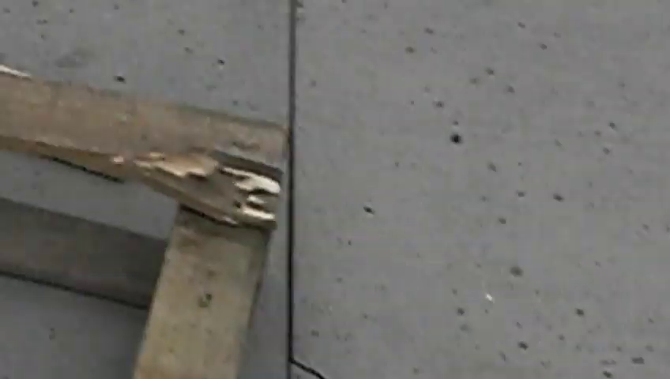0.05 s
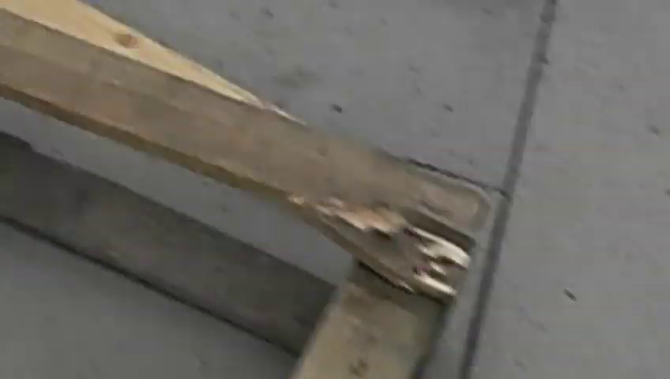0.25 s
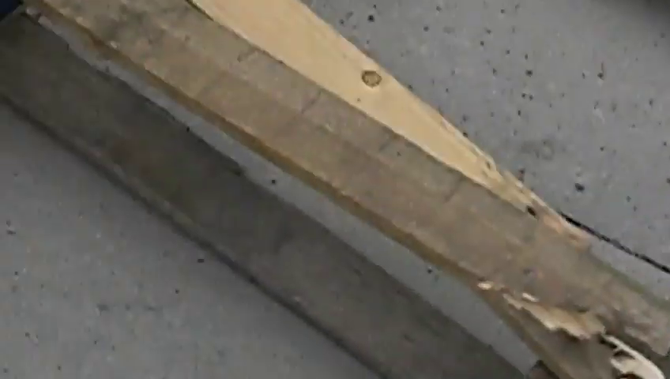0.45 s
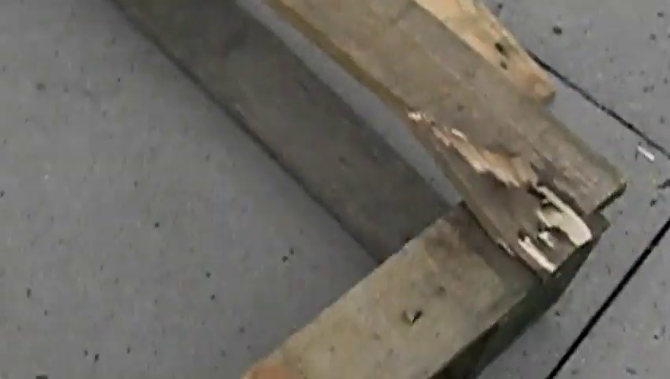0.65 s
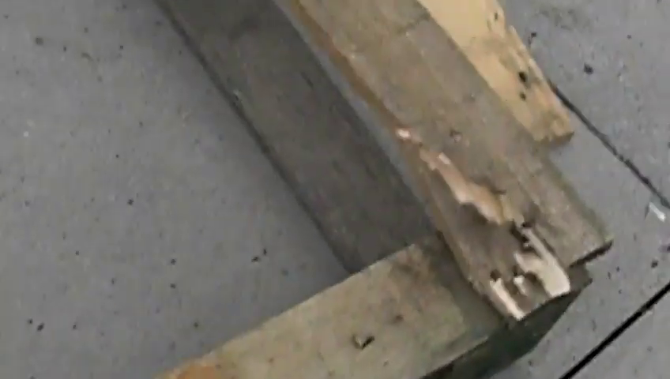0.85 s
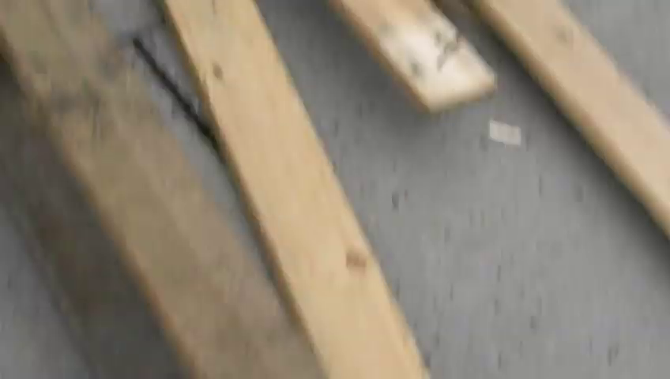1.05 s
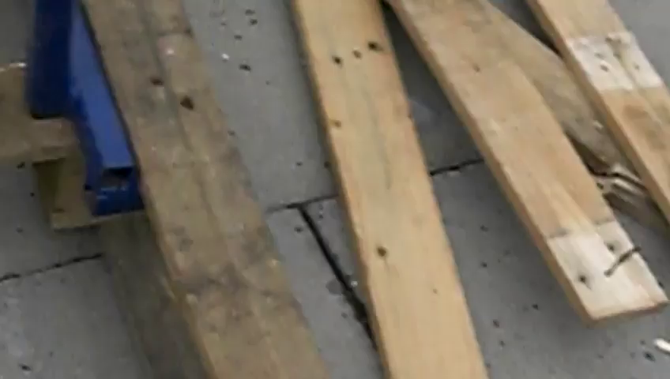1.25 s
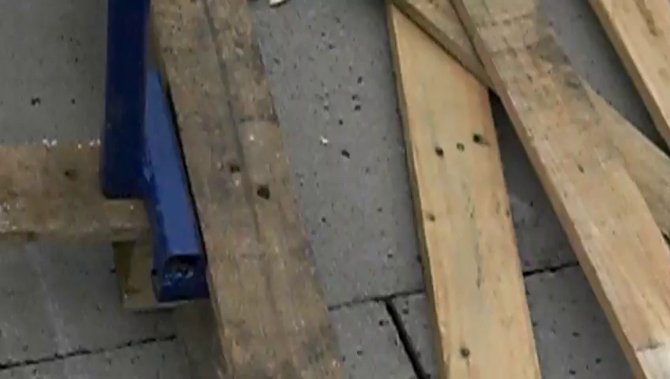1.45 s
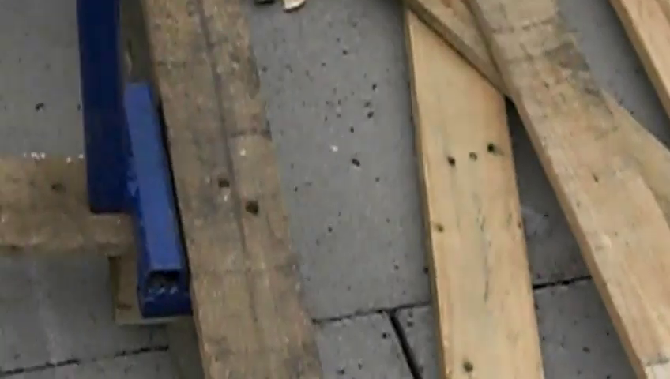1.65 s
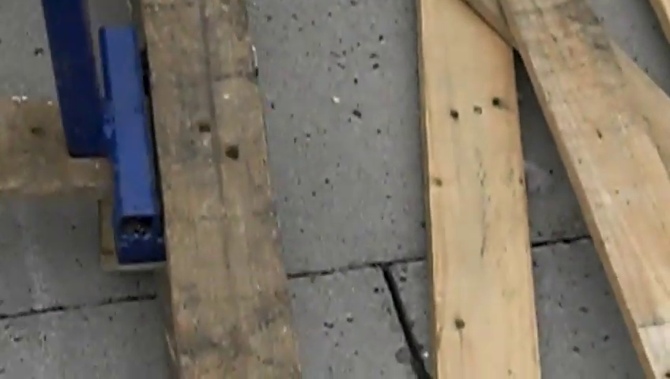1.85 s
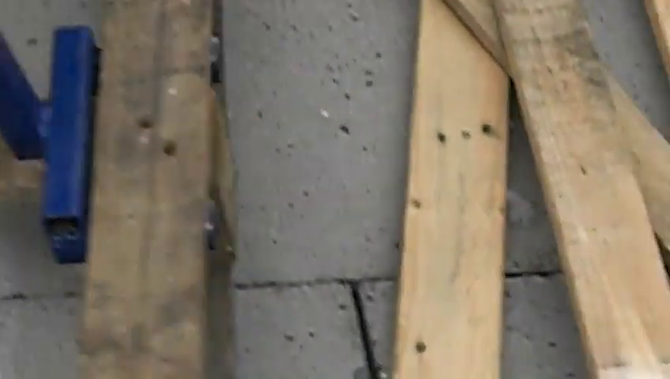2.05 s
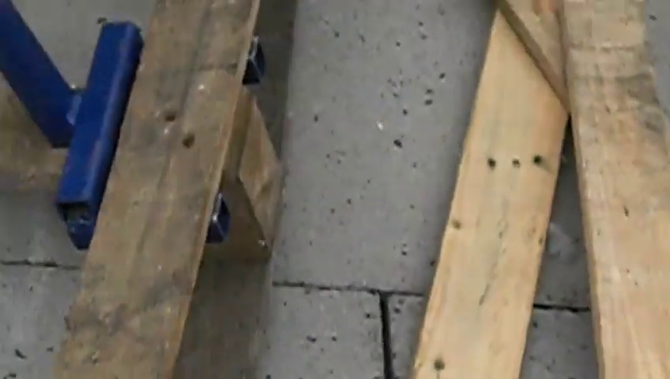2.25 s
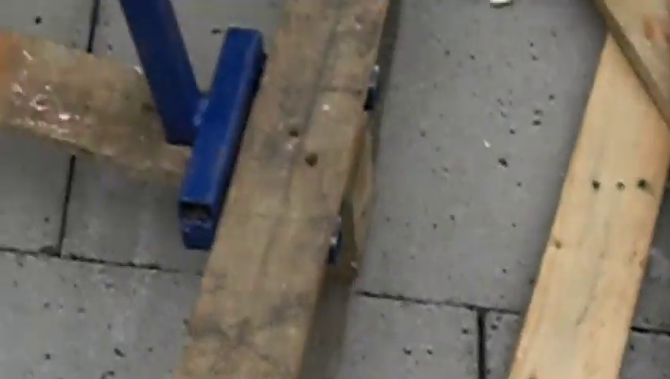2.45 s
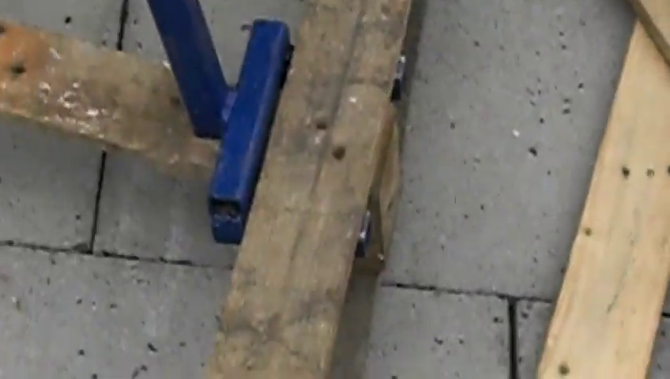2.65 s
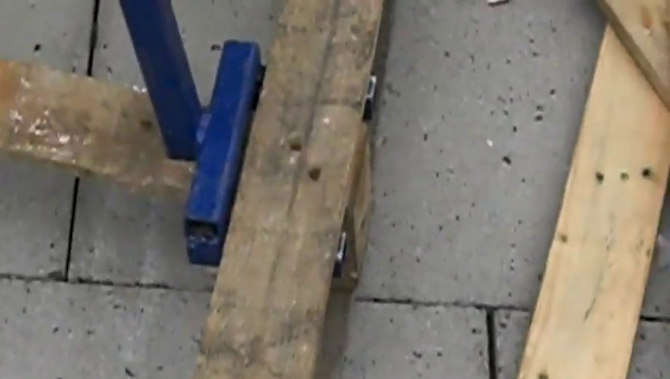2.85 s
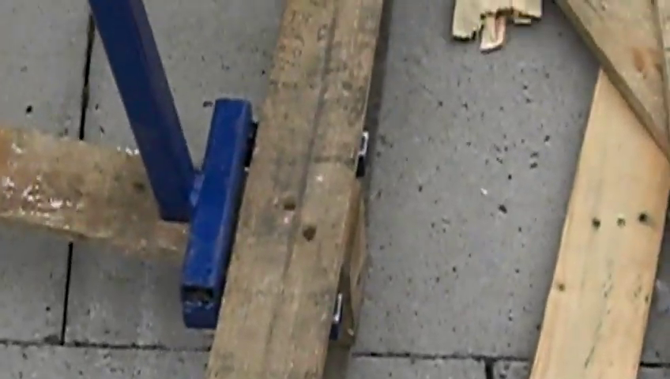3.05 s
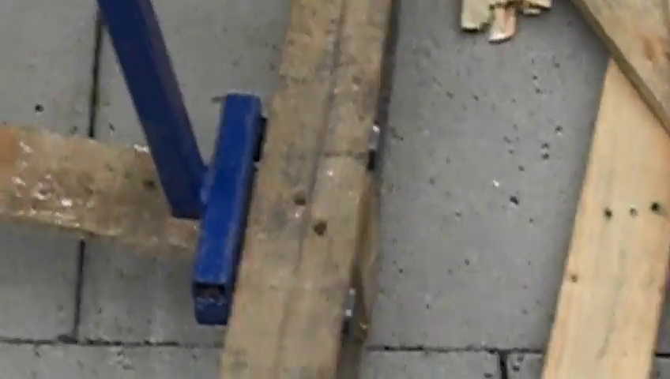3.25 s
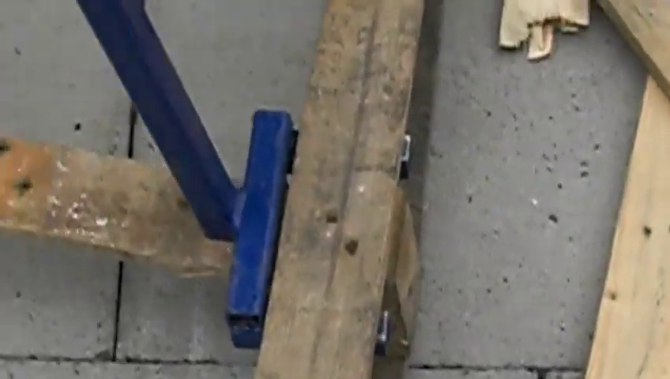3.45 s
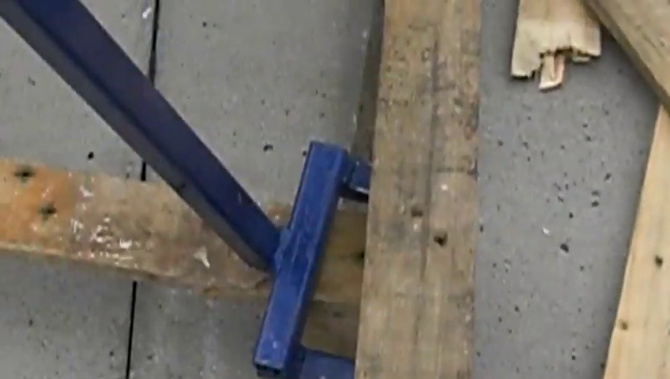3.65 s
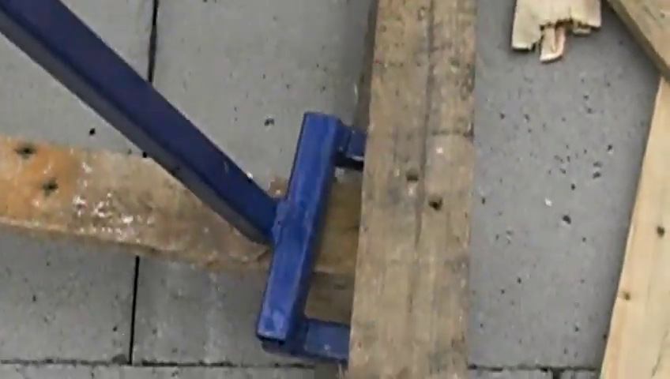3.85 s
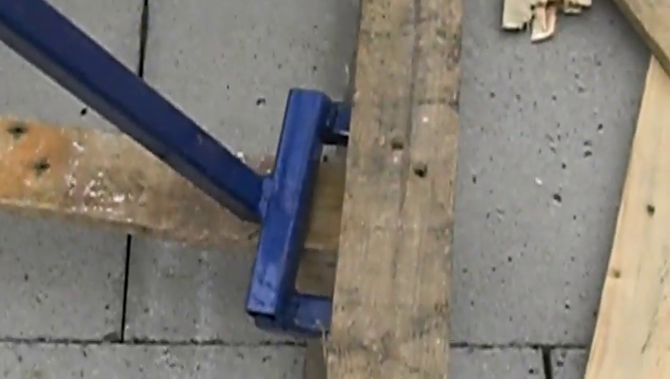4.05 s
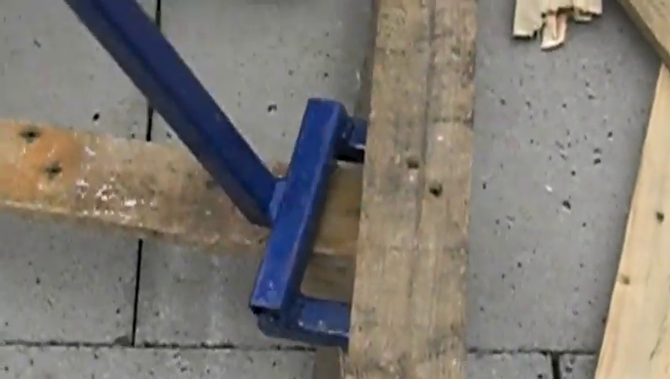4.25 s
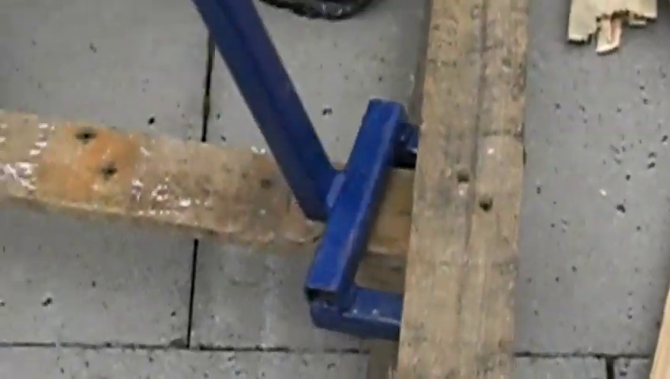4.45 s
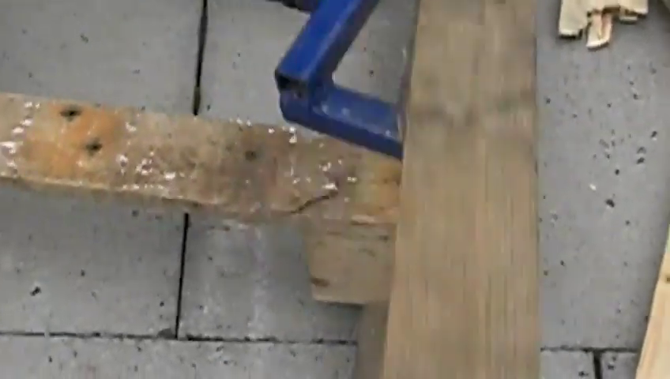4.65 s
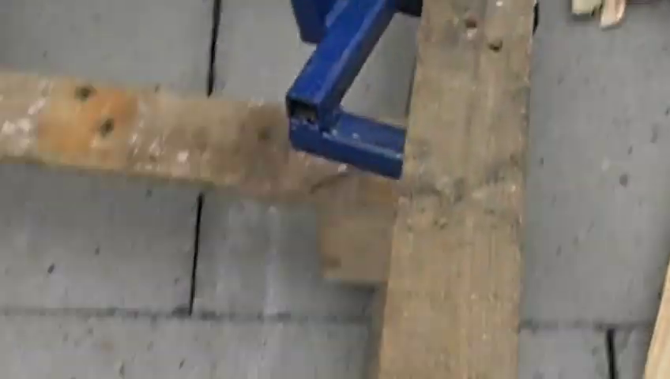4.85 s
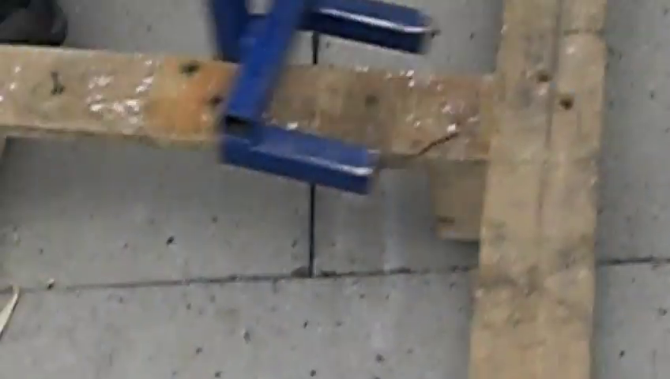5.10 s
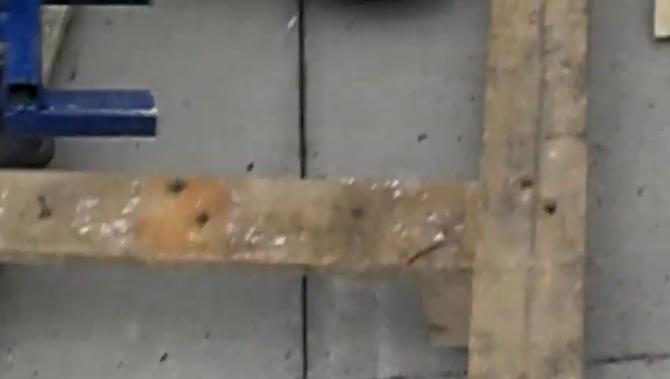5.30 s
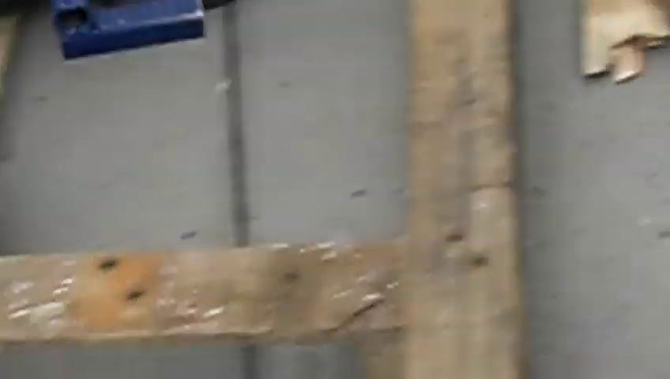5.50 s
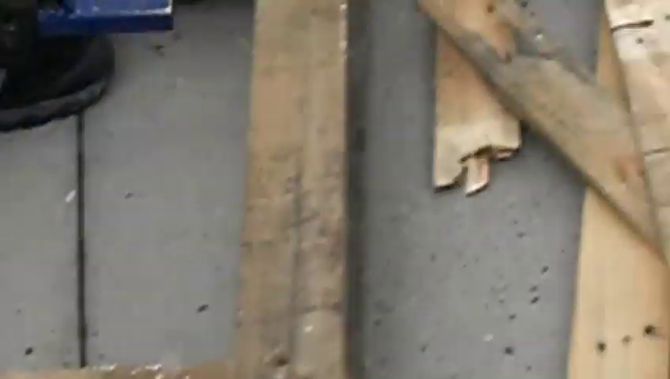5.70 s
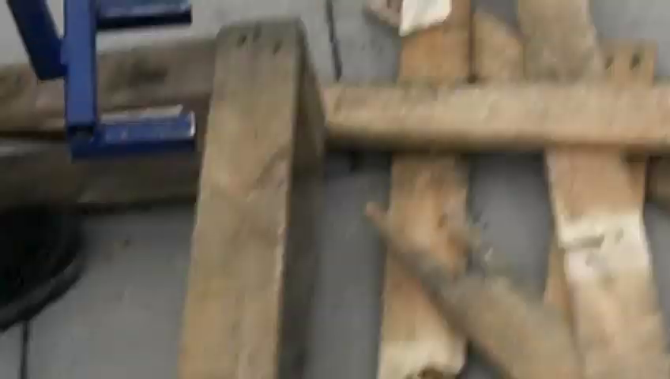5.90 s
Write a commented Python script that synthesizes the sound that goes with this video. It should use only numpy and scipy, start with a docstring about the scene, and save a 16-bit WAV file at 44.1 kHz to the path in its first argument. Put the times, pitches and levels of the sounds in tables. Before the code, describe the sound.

A steel bar prises pallet boards apart on paving. Quiet knocks and gritty scrapes come first, then a sharp splitting burst with metallic nail ring, a tiny nail chirp, a lull, and a second longer ragged crackle. Later sounds are duller bumps, ticks and heavy gusts rumbling and popping on the microphone. Dry and close, with short scattered yard echoes; loud cracks briefly duck the background.

```python
"""A wooden pallet cracks and gives up its nails as a steel bar levers it apart outdoors, close by.
Noise bursts ring wood and nail resonances for the cracks, knocks and ticks; sparse slips make the rubs.
Boards knock and tick as the bar is seated; two heaves crack the wood and jerk the nails out in slips.
Then gusts buffet the microphone with shaped noise and eddy pulses, over a distant wash.
A gain control ducks the whole sound on loud cracks and recovers slowly."""
import sys
import numpy as np
from scipy import signal
from scipy.fft import rfft, irfft, next_fast_len
from scipy.io import wavfile
from scipy.ndimage import uniform_filter1d

SR = 44100
rng = np.random.default_rng(int(sys.argv[2]) if len(sys.argv) > 2 else 0)


def master(y):
    """Save y as 16-bit WAV."""
    cut = np.clip(np.atleast_2d(y).T, -1, 1)
    pcm = np.round(cut * 32767)  # scale
    wavfile.write(sys.argv[1], SR, pcm.astype(np.int16))


N = 261513

# resonances of the boards: (frequency [Hz], width [Hz], level [dB])
BOARD_MODES = [(268, 170, 2), (484, 230, -2.5), (603, 45, 1.5), (840, 82, 1.5), (1065, 43, 4.5),
               (1228, 28, 3), (1336, 45, 7.5), (1733, 60, -9), (2043, 56, 5), (2346, 30, 4),
               (2900, 42, -0.5), (2960, 80, -9.5), (4030, 110, 3), (4700, 40, -3.5)]
# resonances of nails gripped in wood, against the bar: (frequency [Hz], width [Hz], level [dB])
NAIL_MODES = [(1224, 27, 6.5), (1381, 80, 5), (2368, 42, 11), (3660, 71, 6.5), (4390, 140, 3),
              (4540, 97, -2.5), (5010, 140, -8.5), (5345, 80, -10.5), (6106, 77, 4), (7200, 200, 0),
              (9630, 83, 5.5), (11300, 70, -1.5)]
# colour of a fracture: (frequency [Hz], level [dB])
FRACTURE_COLOUR = [(100, -10), (250, -2.5), (450, -7), (800, 1.5), (1300, -2), (1900, 4), (3000, 3.5),
                   (5000, 6), (6600, -3), (9500, -3.5), (11000, -6.5), (14000, -6), (17000, -9.5)]
# colour of rubbing and torn fibres: (frequency [Hz], level [dB])
RUB_COLOUR = [(600, -20.5), (1400, 5.5), (2500, -2.5), (4800, 2), (6600, -7.5), (9000, -9.5),
              (17000, -15.5)]
# the body, middle and edge of a blow
BANDS = [signal.butter(3, edge, kind, fs=SR, output="sos")
         for edge, kind in [(1500, "low"), ((1500, 6000), "band"), (6000, "high")]]


def gain_of(db):
    """Decibels to amplitude."""
    return 10 ** (np.asarray(db) / 20)


def evened(x):
    """Scales to rms 1."""
    return x / np.sqrt(np.mean(x ** 2) + 1e-20)


def read(points, hz):
    """Reads a curve on a log-frequency axis."""
    f, value = np.transpose(points)
    return np.interp(np.log(hz + 1), np.log(f + 1), value)


def add(mix, s, sound):
    """Mixes a sound in at time s, cut off at the end of the mix."""
    part = mix[max(round(s * SR), 0):][:len(sound)]
    part += sound[:len(part)]


def colour(x, spectrum):
    """Causal minimum-phase filter with the given spectrum; the result has rms 1."""
    size = next_fast_len(2 * len(x))
    log_gain = np.log(gain_of(read(spectrum, abs(np.fft.fftfreq(size, 1 / SR)))))
    response = np.exp(np.conj(signal.hilbert(log_gain)))
    filtered = irfft(rfft(x, size) * response[:size // 2 + 1], size)
    return evened(filtered[:len(x)])


def resonate(x, hz, width):
    """One decaying resonance of gain 1; a narrower one rings longer."""
    r = np.exp(-np.pi * width / SR)
    return 2 * signal.lfilter([1 - r], [1, -r * np.exp(2j * np.pi * hz / SR)], x).real


def ring_body(x, modes):
    """The driving sound plus every resonance of the body it excites."""
    return x + sum(gain_of(db) * resonate(x, hz, width) for hz, width, db in modes)


def wander(hz):
    """Random drift of rms 1, no faster than the given rate."""
    spectrum = rfft(rng.standard_normal(N))
    return evened(irfft(spectrum * (np.fft.rfftfreq(N, 1 / SR) < hz), N))


def impulses(per_s):
    """Ones at chance moments among zeros, at an average rate per second."""
    return rng.random(N) < per_s / SR


def swells(rows, rise_s, release_db_per_s, fade_db_per_s=0):
    """Gain for every sample: each row rises, holds or fades for its length, then is released."""
    t, power = np.arange(N) / SR, np.zeros(N)
    for start, length, db in rows:
        age = np.maximum(t - start, 0)
        fall_db = fade_db_per_s * age + release_db_per_s * np.maximum(age - length, 0)
        power += (np.minimum(age / rise_s, 1) * gain_of(db - fall_db)) ** 2
    return np.sqrt(power)


def blow(db, bass_db, treble_db, hz, t60, rise, modes, spectrum, width_hz, focus_db, grain_db, bass_hold):
    """A swelling rush of tiny fractures rings the body; the struck spot adds a resonance of its own."""
    t = np.arange(4096) / SR
    noise, grain = rng.standard_normal((2, len(t)))
    grain = np.tanh(evened(uniform_filter1d(grain, size=16)))
    rush = noise * gain_of(grain_db * grain)  # uneven, gritty loudness
    rush *= 1 - np.exp(-(t / rise) ** 2)
    out = np.zeros(len(t))
    for band, band_db, hold in zip(BANDS, (bass_db, 0, treble_db), (bass_hold, 1, 1)):
        push = colour(rush * gain_of(-60 * t / (t60 * hold)), spectrum)
        ring = ring_body(push, modes) + gain_of(focus_db) * resonate(push, hz, width_hz)
        ring = signal.sosfilt(band, ring)
        attack = np.std(ring[:265])  # the first 6 ms set the level
        out += gain_of(db + band_db) * ring / attack
    return out


def air():
    """The distant outdoor wash: coloured noise whose level drifts slightly."""
    # colour of the wash: (frequency [Hz], level [dB])
    wash_colour = [(40, -14), (150, -5), (250, 1), (511, -5), (850, 0), (1150, -2), (1610, -11),
                   (2600, -13.5), (4320, -15.5), (6500, -20.5), (9000, -21), (17000, -24)]
    wash = colour(rng.standard_normal(N), wash_colour)
    return gain_of(-51) * wash * gain_of(0.32 * wander(12))


def wind():
    """Puffs and gusts rumble at the microphone; gusts add a stream of small whirls and single large eddies."""
    # colour of the low wind noise: (frequency [Hz], level [dB])
    rumble_colour = [(10, -13), (28, -1.5), (55, 1), (100, -4), (170, -9), (280, -18.5), (500, -30),
                     (1200, -62)]
    # colour of the large whirls in a gust: (frequency [Hz], level [dB])
    buffet_colour = [(30, -21), (90, -9.5), (180, 0), (330, -4), (520, -11), (800, -26), (1300, -43.5),
                     (2500, -59), (6000, -69)]
    # colour of the small whirls in a gust: (frequency [Hz], level [dB])
    tear_colour = [(100, 2), (500, 9), (900, 1), (1400, -13), (2200, -33), (6000, -45)]
    # soft puffs of air on the microphone: (start [s], length [s], level [dB])
    puff_rows = [(.48, .04, -42), (.72, .08, -44), (.83, 0.13, -32.5), (1.06, 0.14, -36), (1.36, 0.03, -42),
                 (1.51, 0.025, -36), (1.69, 0.062, -41), (2.3, 0.023, -40), (2.6, 0.4, -51),
                 (2.97, 0.26, -40), (3.33, 0.06, -35), (3.92, 0.072, -32.5), (4.06, 0.18, -35),
                 (5.08, 0.47, -33.5), (5.41, 0.053, -28.5), (5.56, .04, -37.5), (5.7, 0.05, -21),
                 (5.82, 0.1, -21)]
    # gusts strong enough to turn turbulent at the microphone port: (start [s], length [s], level [dB])
    gust_rows = [(4.2, 0.03, -16.5), (4.287, 0.089, -18), (4.39, 0.14, -16), (4.55, 0.1, -21.5),
                 (4.848, 0.068, -15.5), (4.935, 0.046, -17), (5.708, 0.0087, -17.5), (5.828, 0.039, -19.5)]
    # single eddies hitting the port: (time [s], peak level [dB])
    eddy_rows = [(4.21, -17), (4.298, -1.5), (4.327, -9.5), (4.348, -27), (4.365, -3.5), (4.961, -3.5),
                 (4.979, 2.5), (5.719, -10.5), (5.7224, -8.5), (5.841, -14)]
    calm_db, gust_rumble_db, fine_db = -51, -9, -12.5
    gust_rise_s, eddy_width_s = 0.012, 0.00088

    puffing = swells(puff_rows, rise_s=0.024, release_db_per_s=170)
    gust_rumble = gain_of(gust_rumble_db) * swells(gust_rows, gust_rise_s, release_db_per_s=112)
    pressure = np.sqrt(gain_of(calm_db) ** 2 + puffing ** 2 + gust_rumble ** 2)
    out = pressure * colour(rng.standard_normal(N), rumble_colour)

    lumps = np.tanh(wander(90))
    whirls = rng.standard_normal(N) * impulses(per_s=420)
    coarse = colour(rng.standard_normal(N) * gain_of(7.5 * lumps), buffet_colour)
    fine = colour(whirls * gain_of(5.5 * lumps), tear_colour)  # the fastest air breaks into smaller whirls
    gusting = swells(gust_rows, gust_rise_s, release_db_per_s=348)
    out += gusting * (coarse + gain_of(fine_db) * fine)

    t = np.arange(N) / SR
    for s, db in eddy_rows:
        u = np.maximum(t - s, 0) / eddy_width_s
        out -= gain_of(db) * u * (2 - u) * np.exp(1 - u) * np.tanh(2 * u) ** 2  # suction, then pressure
    return out


def yard(x):
    """Scattered echoes from paving and walls, each band dying at its own speed."""
    # decay of the echoes: (frequency [Hz], t60 [s])
    echo_decay = [(200, 0.29), (700, 0.26), (1700, 0.4), (4600, 0.2), (12000, 0.14), (17000, 0.26)]
    taps = rng.standard_normal(SR) * (rng.random(SR) < 4000 / SR)  # 4000 echoes per second
    hz, t, bins = signal.stft(taps, SR, nperseg=256)
    fade = gain_of(-60 * t / read(echo_decay, hz)[:, None])
    tail = signal.istft(bins * fade, SR, nperseg=256)[1]
    tail *= 1 - np.exp(-(np.arange(len(tail)) / SR / 0.0076) ** 2)  # the echoes build up over some 8 ms
    return signal.fftconvolve(x, tail / np.linalg.norm(tail))[:N]


def fibres():
    """Clumps of minute slips as wood rubs on wood, steel and paving; now and then a fibre or grain snaps."""
    # wood dragging after it shifts: (start [s], length [s], level [dB] before the layer gain)
    rub_rows = [(0, 0.16, -62), (1.05, 0.22, -53), (2.12, 0.076, -38), (2.3, 0.11, -41), (2.62, .2, -48),
                (3.68, 0.15, -48), (4.2, 0.23, -49), (4.76, .3, -51), (5.42, .08, -51.5), (5.76, 0.22, -58)]
    slips = rng.standard_normal(N) * impulses(per_s=12000)
    slips *= gain_of(1.4 * wander(260) + 3.25 * wander(41))
    slips = ring_body(slips, NAIL_MODES)

    catches = impulses(per_s=110) * rng.uniform(0.2, 1, N)
    snap_fade = np.exp(-np.arange(300) / SR / 0.0011)
    catches = signal.oaconvolve(catches, snap_fade)[:N] * rng.standard_normal(N)

    rubbing = colour(slips, RUB_COLOUR) + gain_of(-4) * colour(catches, FRACTURE_COLOUR)
    dragging = swells(rub_rows, rise_s=0.007, release_db_per_s=148, fade_db_per_s=16)
    return gain_of(-4.0) * dragging * rubbing


def ticks():
    """Small dry snaps ring the boards, each trailed by two weaker ones at chance moments."""
    # splinters and grit snapping: (time [s], level [dB] before the layer gain, main resonance [Hz])
    tick_rows = [(1.1472, -49, 2180), (1.1817, -42, 4800), (1.207, -45, 4060), (1.5658, -45.5, 2490),
                 (1.6243, -55, 9000), (1.9033, -51, 4220), (1.9429, -50, 4820), (2.2003, -47, 6000),
                 (2.4006, -41.5, 5800), (2.6673, -43.5, 5000), (2.7583, -50, 4660), (2.794, -51, 4730),
                 (3.388, -42.5, 4900), (3.8546, -52, 4900), (3.9499, -45.5, 5000), (4.304, -33.5, 3560),
                 (4.344, -50.5, 9000), (4.414, -46.5, 5440), (4.7817, -39.5, 5160), (4.9087, -37, 3500),
                 (4.9779, -32, 1520), (5.4238, -44.5, 4500)]
    trail_db = -8.5  # each further snap
    out = np.zeros(N)
    for s, db, hz in tick_rows:
        treble_db = -3.5 + 5.5 * np.log2(hz / 4500)  # smaller splinters ring higher and snap brighter
        delays = [0, rng.uniform(0.004, 0.0088), rng.uniform(0.0074, 0.022)]
        for k, delay in enumerate(delays):
            snap = blow(db + k * trail_db, -5, treble_db, hz, t60=0.043, rise=0.0005,
                        modes=BOARD_MODES, spectrum=FRACTURE_COLOUR,
                        width_hz=280, focus_db=3.5, grain_db=7.0, bass_hold=0.92)
            add(out, s + delay, snap)
    return gain_of(2.5) * out


def squeak(s=2.443, hz=1335, db=-34):
    """A nail chirps once in its hole: a steady tone that swells and dies within milliseconds."""
    t = np.arange(4096) / SR
    u = t / 0.0034  # loudest at 3.4 ms
    out = np.zeros(N)
    add(out, s, gain_of(db) * u * np.exp(1 - u) * np.sin(2 * np.pi * hz * t))
    return out


def knocks():
    """Duller blows in which the boards ring, each followed by a weaker, longer rebound."""
    # boards and bar bumping: (time [s], level [dB] before the layer gain, bass re level [dB],
    # treble re level [dB], main resonance [Hz])
    knock_rows = [(.012, -50.5, 7, -7, 600), (0.0606, -49, 1.5, -16, 1570), (.16, -51, -2, -7, 3550),
                  (.303, -40, -3.5, -27, 1270), (.533, -49, 3.5, -4, 740), (0.569, -51, 7.5, -7, 1130),
                  (0.7896, -39.5, -9, -7, 3300), (0.9153, -20.5, -3, -7.5, 2570),
                  (0.9469, -42, 2.5, -13, 3020), (0.9573, -32.5, -11, -2, 4150),
                  (1.0588, -33, 2.5, -10.5, 945), (1.5157, -37.5, 4.5, -14, 1180),
                  (1.581, -44, -7, -10, 1100), (1.9833, -23.5, -0.5, -4.5, 2080),
                  (2.1664, -34, -3.5, -13, 2980), (2.2838, -23.5, -8, -9.5, 2900),
                  (3.5846, -20, -1, -17, 1180), (3.6149, -28, -8, -25, 1630),
                  (3.6809, -33.5, -5, -25, 1310), (3.737, -27.5, -16.5, -10.5, 1840),
                  (3.965, -38, -8.5, -20, 1160), (4.627, -29, 0.5, -3.5, 2610),
                  (5.0187, -22.5, 8, -15.5, 2050), (5.044, -35.5, -7, -1, 2900),
                  (5.061, -38, -21, -2, 2700), (5.2358, -43.5, 8, -11, 670)]
    # colour of a bump: (frequency [Hz], level [dB])
    bump_colour = [(80, -3.5), (250, 10), (700, 6.5), (1500, 1), (3500, -3.5), (5000, -11.5), (8000, -25),
                   (10000, -25.5), (17000, -36)]
    rise_s = 0.0004
    rebound_s, rebound_db, rebound_treble_db = 0.012, -14.5, -0.5
    out = np.zeros(N)
    for s, db, bass_db, treble_db, hz in knock_rows:
        knock = blow(db, bass_db, treble_db, hz, 0.035, rise_s, BOARD_MODES, bump_colour,
                     width_hz=400, focus_db=17, grain_db=0, bass_hold=1.61)
        add(out, s, knock)
        # a struck board drops back and chatters
        rebound = blow(db + rebound_db, bass_db, treble_db + rebound_treble_db, hz, 0.07, rise_s,
                       BOARD_MODES, bump_colour, width_hz=290, focus_db=2, grain_db=10.5, bass_hold=0.8)
        add(out, s + rebound_s, rebound)
    return gain_of(2.0) * out


def splinters(snaps):
    """After each bright crack the torn fibres go on popping, ever more weakly."""
    keep = np.exp(-1 / (0.017 * SR))  # stress drains over 17 ms
    treble_power = signal.sosfilt(BANDS[2], snaps) ** 2
    stress = np.sqrt(signal.lfilter([1 - keep], [1, -keep], treble_power))
    pop_db = 4.2 * np.minimum(rng.exponential(1, N), 3)
    pops = impulses(per_s=190) * gain_of(pop_db)
    fade = np.exp(-np.arange(600) / SR / 0.0035)
    crackle = signal.oaconvolve(pops, fade)[:N] * rng.standard_normal(N)
    return gain_of(-10.0) * stress * colour(crackle, RUB_COLOUR)


def cracks():
    """Short, bright bursts ring the nails as wood splits and nails let go."""
    # wood splitting and nails slipping: (time [s], level [dB], bass re level [dB],
    # treble re level [dB], main resonance [Hz], t60 [s])
    crack_rows = [(2.0144, -14, -21, 6.5, 4440, .03), (2.0167, -0.5, -8, -8, 4320, 0.013),
                  (2.0216, -11.5, -16.5, 1, 4120, 0.017), (2.0395, -15, -8.5, -8, 5080, 0.023),
                  (2.045, -8, -17, -0.5, 5000, 0.029), (2.0539, -11.5, -26, -2.5, 4900, .025),
                  (2.0678, -15.5, -23, 0.5, 4930, 0.033), (2.082, -14, -25, -2, 4950, 0.026),
                  (2.102, -17, -13, -2, 4700, 0.03), (3.3985, -32, -13, -9.5, 4800, 0.061),
                  (3.4148, -19, -5, -3, 4400, 0.066), (3.4176, -14, -10.5, -26, 4330, 0.028),
                  (3.4524, -23.5, -9, 6, 6940, 0.021), (3.471, -25, -7, -11, 6970, 0.028),
                  (3.4769, -25.5, -23, 11, 6940, .015), (3.4846, -22, -14, -3, 6940, 0.026),
                  (3.495, -14, -11.5, -0.5, 6870, 0.036), (3.5038, -2.5, -14.5, 1.5, 5450, 0.015),
                  (3.5254, -10, -15.5, -3, 4180, 0.024), (3.5372, -10, -16, -6, 5340, .021),
                  (3.541, -11.5, 2.5, -25, 1900, 0.039), (3.55, -6.5, -5, -14, 1380, 0.02),
                  (4.106, -22.5, -4, -9.5, 3530, 0.017), (4.1121, -20, -6, -9, 4430, .028)]
    out = np.zeros(N)
    for s, *row in crack_rows:
        crack = blow(*row, rise=0.00052, modes=NAIL_MODES, spectrum=FRACTURE_COLOUR,
                     width_hz=470, focus_db=8, grain_db=7.5, bass_hold=2.2)
        add(out, s, crack)
    return out


def scene():
    """The pallet in its yard, with wind and distant air."""
    breaking = cracks()
    snaps = breaking + splinters(breaking) + ticks()
    bumps = knocks() + squeak()
    echo = yard(gain_of(-17.5) * snaps + gain_of(-15.5) * bumps)
    return (snaps + bumps + echo + fibres() + wind() + air())[None]


def record(dry):
    """Gain control with a slow recovery, overload, then the band limit."""
    threshold_db, recovery_db_per_s, edge_hz = -12.5, 40.0, 17050
    power = abs(uniform_filter1d(dry[0] ** 2, size=220))  # averaged over 5 ms
    power_db = 10 * np.log10(power + 1e-12)
    fall = np.arange(N) * recovery_db_per_s / SR
    held_db = np.maximum.accumulate(power_db + fall) - fall  # peaks held, then sinking steadily
    over_db = np.maximum(held_db - threshold_db, 0)
    cut_db = 0.5 * uniform_filter1d(over_db, size=100)  # half of the excess is taken off
    ducked = np.clip(dry / gain_of(cut_db), -1, 1)
    low_pass = signal.firwin(511, edge_hz, window=("kaiser", 8), fs=SR)
    return signal.oaconvolve(ducked, low_pass[None], "same")


dry = scene()
out = record(dry)
master(out)
```